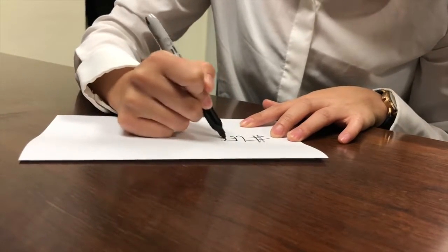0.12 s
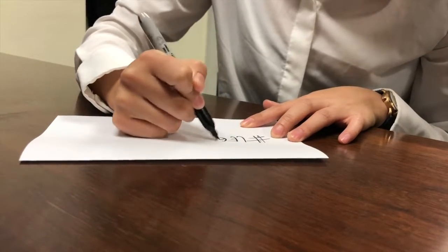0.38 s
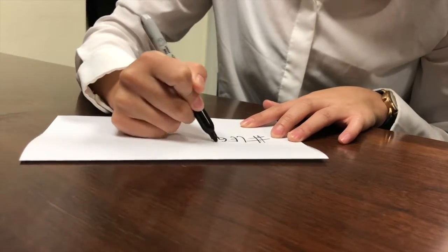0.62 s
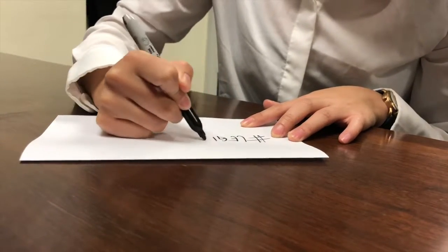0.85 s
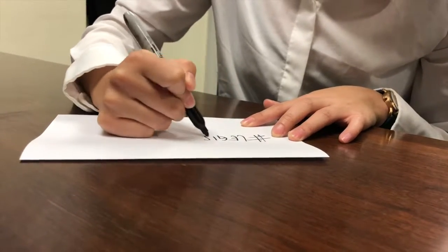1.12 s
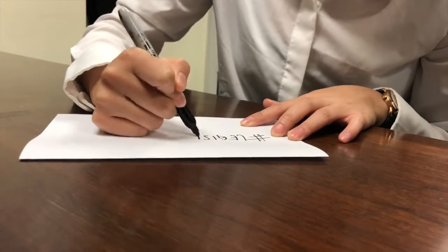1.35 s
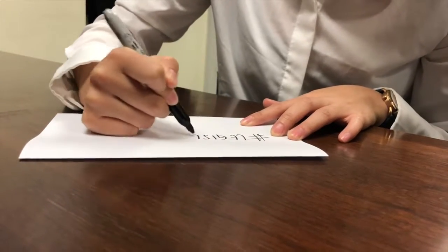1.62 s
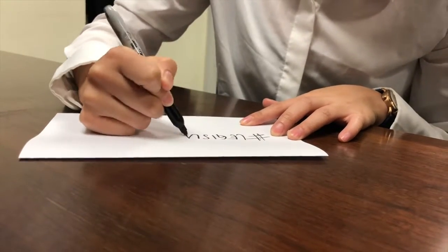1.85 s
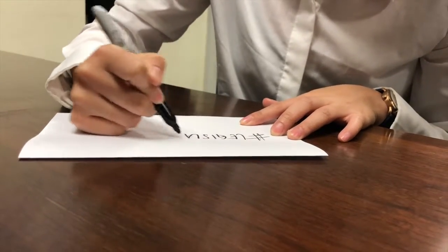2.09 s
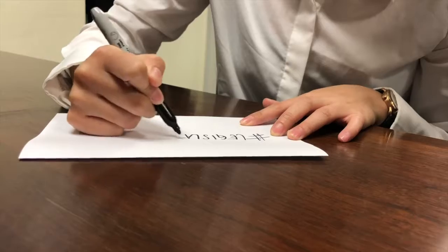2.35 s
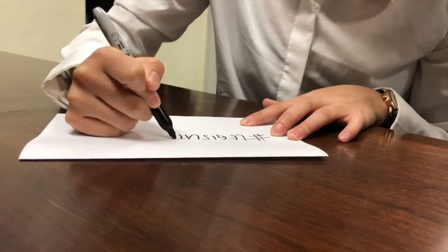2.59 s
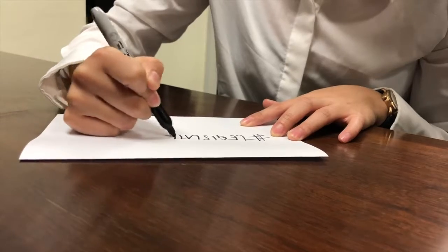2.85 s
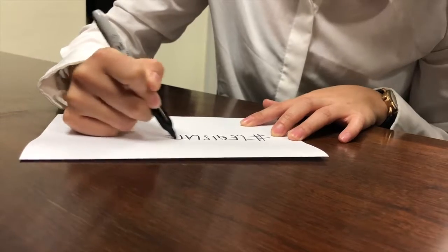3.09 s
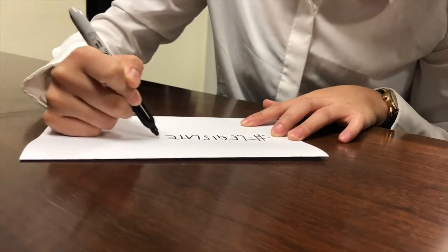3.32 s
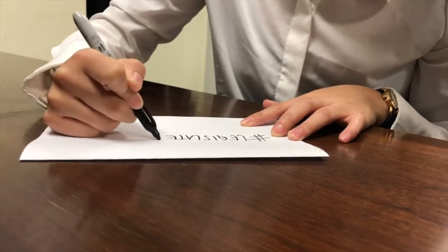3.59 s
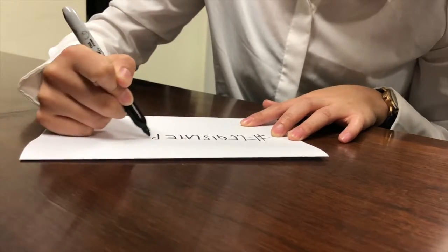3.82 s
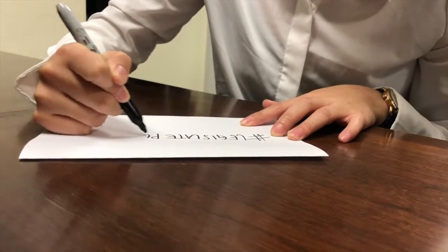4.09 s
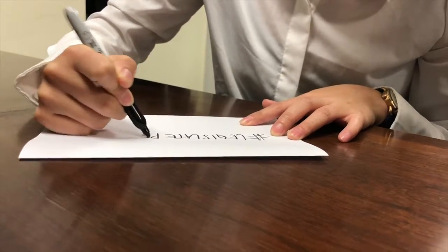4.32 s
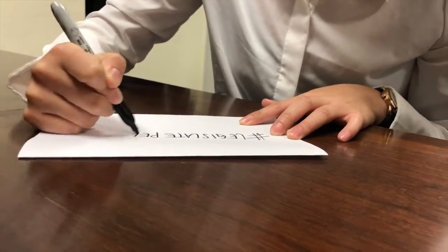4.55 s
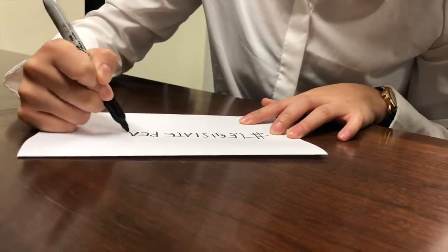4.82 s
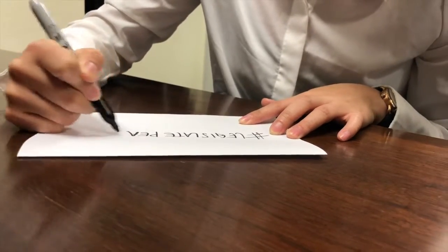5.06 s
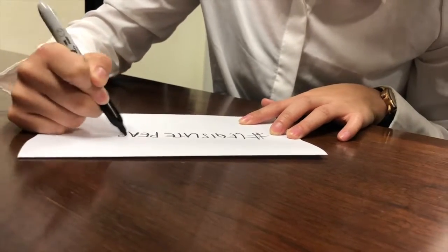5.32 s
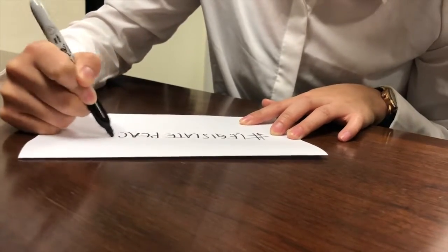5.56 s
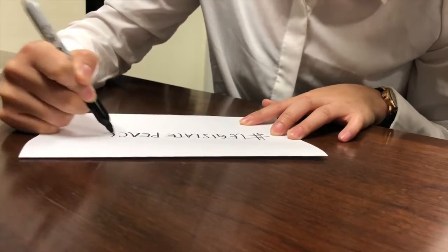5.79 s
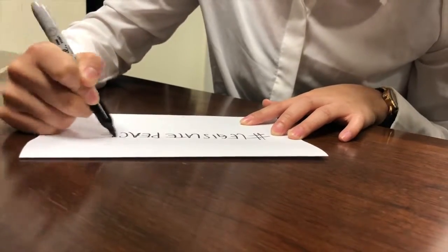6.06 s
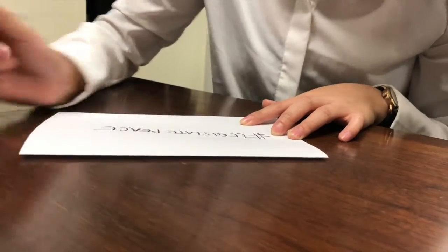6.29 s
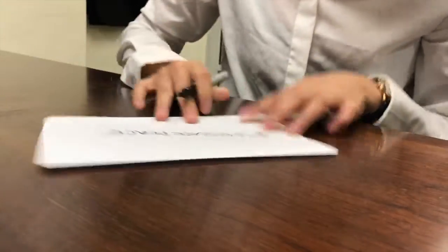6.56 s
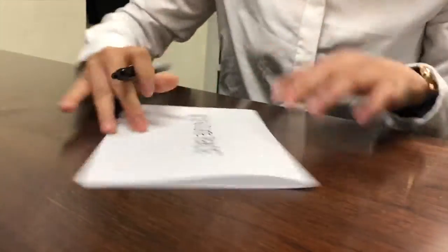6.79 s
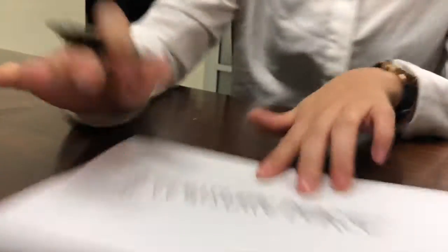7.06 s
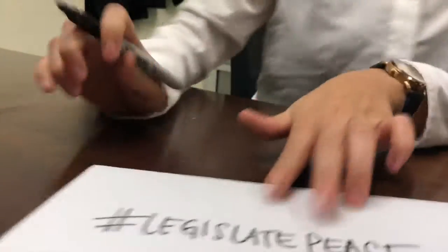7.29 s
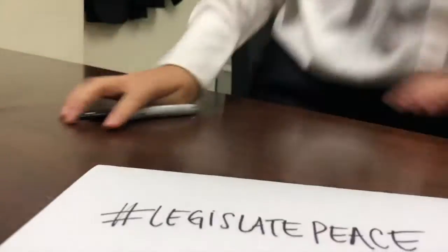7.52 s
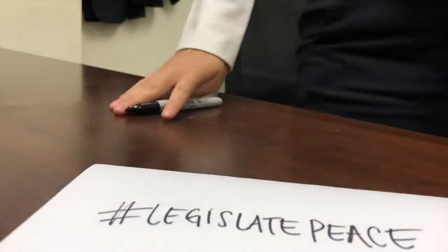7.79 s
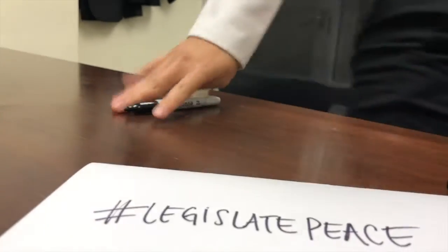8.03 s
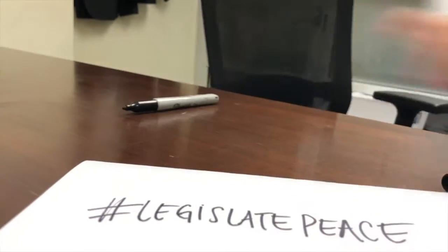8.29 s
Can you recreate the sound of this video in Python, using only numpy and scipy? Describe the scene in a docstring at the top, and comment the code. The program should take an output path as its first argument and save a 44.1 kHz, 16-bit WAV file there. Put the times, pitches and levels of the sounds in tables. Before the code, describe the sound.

A felt-tip marker hisses in quick strokes over paper on a wooden desk, paper slides round, the marker clatters down, a chair creaks.

```python
"""Felt fibres hiss over paper first: a marker writes capitals on a sheet on a wooden desk, most letters opening
with a soft thud. The hiss is stick-slip noise in resonances; the thud is a contact force driving desk modes.
The sheet is then turned round, the marker clatters down (modal rings and a crack) and the writer rises from a
chair (clumped slips in a resonance). Throughout there is faint noise; at the end a wide low rumble swells."""
import sys
import numpy as np
from scipy import signal
from scipy.fft import rfft, irfft
from scipy.io import wavfile
from scipy.ndimage import uniform_filter1d

SR = 44100
rng = np.random.default_rng(int(sys.argv[2]) if len(sys.argv) > 2 else 0)


def how_loud(loudness_db):
    """Turn decibels into a plain amplitude multiplier (0 dB gives 1, 20 dB gives 10)."""
    steps = np.asarray(loudness_db, float) / 20
    return 10 ** steps


def transcribe(signal):
    """Save signal, clipped to [-1, 1], as a 16-bit WAV file at the path in sys.argv[1]."""
    frames = np.atleast_2d(signal).T
    limited = np.clip(frames, -1, 1)
    pcm = np.round(limited * 32767).astype(np.int16)
    wavfile.write(sys.argv[1], SR, pcm)


N = 370426  # samples, 8.4 s


def evened(x):
    """Normalization: scales a signal to unit rms."""
    return x / np.sqrt(np.mean(x ** 2) + 1e-20)


def read(points, hz):
    """Logarithmic frequency axis: interpolates a table of (f/Hz, value) on it."""
    f, value = np.transpose(points)
    return np.interp(np.log(hz + 1), np.log(f + 1), value)


def add(mix, s, sound):
    """Superposition: adds a sound to the mix from s seconds on."""
    part = mix[round(s * SR):][:len(sound)]
    part += sound[:len(part)]


def unroll(rows):
    """Linear interpolation: returns the start time, then every column sample by sample."""
    s, *columns = np.transpose(rows)
    t = np.arange(s[0], s[-1], 1 / SR)
    return s[0], *(np.interp(t, s, c) for c in columns)


def resonate(x, hz, width):
    """Heterodyne resonance: shifts the frequency hz (may vary) to zero, smooths, and shifts back."""
    turn = np.exp(2j * np.pi * np.cumsum(hz * np.ones(len(x))) / SR)
    r = np.exp(-np.pi * width / SR)
    return 2 * (turn * signal.lfilter([1 - r], [1, -r], x / turn)).real


def coloured(x, points):
    """Spectral shaping: weights x by a table of (f/Hz, level/dB), unit rms."""
    weight = how_loud(read(points, np.fft.rfftfreq(len(x), 1 / SR)))
    return evened(irfft(rfft(x) * weight, len(x)))


def band(x, lo_hz, hi_hz):
    """Band limitation: a steep band-pass, unit rms."""
    sos = signal.butter(3, [lo_hz, min(hi_hz, SR / 2.2)], "band", fs=SR, output="sos")
    return evened(signal.sosfilt(sos, x))


def slips(size, spread_db, clump_db):
    """Stick-slip friction: dense tiny slips of uneven size, clumped over a few milliseconds, unit rms."""
    clumps = evened(uniform_filter1d(rng.standard_normal(size), size=130))
    uneven = np.minimum(rng.exponential(1, size), 5)
    return evened(rng.standard_normal(size) * how_loud(spread_db * uneven + clump_db * clumps))


def wander(size):
    """Low-pass random drift: slow chance over some tens of milliseconds."""
    noise = rng.standard_normal(size + 4000)
    return evened(uniform_filter1d(uniform_filter1d(noise, size=1000), size=1000))[2000:-2000]


def ring(modes, tilt_db, scatter):
    """Modal superposition: each blow lands elsewhere and shares its force out anew. tilt_db is per octave."""
    t, out = np.arange(SR // 8) / SR, 0
    for (hz, db, t60), (u, v, w) in zip(modes, rng.standard_normal((len(modes), 3))):
        level = how_loud(db + tilt_db * np.log2(hz / 3000) + scatter * v - 60 * t / t60)
        mode_hz = hz * (1 + 0.0046 * scatter * u)
        out = out + np.sign(w) * level * np.sin(2 * np.pi * mode_hz * t)
    return out / abs(out).max()


def through_plate(x, lag_s, lead_s):
    """Dispersion: bending waves travel as the root of frequency, so the bass arrives last.
    lag_s is the delay at 1 kHz; lead_s advances all below 2 kHz."""
    hz = np.fft.rfftfreq(len(x), 1 / SR)
    cycles = 2 * lag_s * np.sqrt(1000 * hz) - lead_s * np.minimum(hz, 2000)
    return irfft(rfft(x) * np.exp(-2j * np.pi * cycles), len(x))


# spectrum of the steady background noise: (f/Hz, relative level per Hz/dB)
AIR_SPECTRUM = [(15, -51), (25, -19), (70, 6), (200, 5.5), (416, -3.5), (796, -15), (1520, -18),
                (3160, -21.5), (4250, -21.5), (8140, -24), (10700, -25.5), (15800, -31.5), (16400, -79)]


def air():
    """Stationary noise: a random signal with a fixed spectrum, heard in the centre."""
    return how_loud(-69) * coloured(rng.standard_normal(N), AIR_SPECTRUM)


# noise of the rumble: (f/Hz, relative level per Hz/dB)
RUMBLE_SPECTRUM = [(12, -30), (22, 0), (34, 5.5), (50, 3.5), (97, -2), (118, -4), (234, 3), (357, -13.5),
                   (487, -6), (544, -19), (635, -26), (1060, -38), (1840, -55), (3130, -57), (4000, -61),
                   (5200, -96), (8800, -120)]
# fuzzy bands in the rumble: (f/Hz, width/Hz, relative level/dB)
RUMBLE_RESONANCES = [(154, 12, -16), (241, 7.7, -4.5), (480, 25, -16)]
# growth of the rumble: (t/s, level/dB)
RUMBLE_SWELL = [(7.26, -93), (7.35, -80), (7.6, -64.5), (7.8, -61), (8.0, -56), (8.4, -49.5)]
# deep hum in the rumble: (f/Hz, relative level/dB, phase between the ears/rad)
RUMBLE_HUM = (42, 6., 2)


def rumble():
    """Partial interaural coherence: low noise, fuzzy bands and a hum, unlike in the ears, swell to the end."""
    voices = []
    for noise in rng.standard_normal((3, 2 * SR)):
        bands = sum(how_loud(db) * evened(resonate(noise, hz, width)) for hz, width, db in RUMBLE_RESONANCES)
        voices.append(evened(coloured(noise, RUMBLE_SPECTRUM) + bands))
    both, left, right = voices
    t = np.arange(N - 2 * SR, N) / SR
    swell = how_loud(np.interp(t, *np.transpose(RUMBLE_SWELL), left=-200))
    hum_hz, hum_db, ear_phase = RUMBLE_HUM
    hum = how_loud(hum_db) * np.sin(2 * np.pi * hum_hz * t + np.array([[0], [ear_phase]]))
    sound = swell * (1.7 * both + hum + np.array([left, right]))
    return np.pad(sound, ((0, 0), (N - 2 * SR, 0)))


# reverberation time of the room: (f/Hz, t60/s)
ROOM_DECAY = [(200, 0.33), (1000, 0.16), (4000, 0.094), (8000, 0.054), (14000, 0.1)]


def room(x):
    """Reverberation: sparse taps of random sign, each band dying at its own speed."""
    taps = np.zeros(SR // 2)
    at = np.arange(100, SR // 2 - 20, 20)
    taps[at + rng.integers(0, 20, len(at))] = rng.choice([-1., 1.], len(at))
    hz, t, z = signal.stft(taps, SR, nperseg=256)
    decay = how_loud(-60 * t / read(ROOM_DECAY, hz)[:, None])
    tail = signal.istft(z * decay, SR, nperseg=256)[1]
    return signal.fftconvolve(x, tail / np.linalg.norm(tail))[:N]


def chair(s, creak_db, rustle_db, hz):
    """Friction-driven resonance: clumped slips in the chair's resonance, with cloth rustle above."""
    a, b, c = (slips(len(creak_db), spread_db=0.0, clump_db=2.0) for _ in range(3))
    narrow = evened(resonate(resonate(a, hz, 400), hz, 400))
    wide = evened(resonate(b, hz, 1260))
    creak = band(how_loud(-10) * narrow + how_loud(8) * wide, 260, 3100)
    rustle = band(c, 2700, 5900) + how_loud(-7.5) * band(c, 6700, 16000)
    return s, how_loud(creak_db) * (creak + how_loud(rustle_db) * rustle)


# cloth and chair as the writer rises: (t/s, creak level/dB, rustle level re creak/dB, centre of the creak f/Hz)
RISING = [(7.61, -52.5, -16, 990), (7.7, -56.5, -7, 880), (7.78, -58, -12.5, 990), (7.85, -63, -10, 1100),
          (8.0, -61.5, -15, 1560), (8.14, -68.5, -3.5, 1200), (8.27, -77.5, 6, 900), (8.4, -78, -13.5, 950)]


def rise():
    """Sustained friction: level and resonance of chair and cloth glide as the writer rises."""
    return chair(*unroll(RISING))


# short scuffs of the chair: (t/s, length/s, level/dB, rustle level re creak/dB, centre f/Hz)
CHAIR_SCUFFS = [(7.806, 0.03, -53, -11, 1140), (7.899, 0.037, -47.5, -20, 2050),
                (7.942, .07, -56, -17, 1710), (8.044, .04, -60.5, -21.5, 1050),
                (8.172, 0.057, -57, -7.5, 1510), (8.224, .03, -64.5, 3, 1510), (8.34, .03, -66, -4, 1040)]


def scuff(s, length_s, db, rustle_db, hz):
    """Transient friction: a quick catch that fades out."""
    t = np.arange(0, length_s, 1 / SR)
    catch_db = EDGE_DB * np.clip(1 - t / 0.0058, 0, 1)
    fade_db = -11 * (t / length_s) ** 2
    return chair(s, db + catch_db + fade_db, rustle_db, hz)


# brief narrow tones: low bumps in the desk, thin squeaks, creaks of the chair:
# (t/s, length/s, f/Hz, resonance width/Hz, level/dB)
NARROW_TONES = [(3.895, 0.11, 171, 18, -60.5), (6.512, 0.068, 1586, 54, -73), (6.546, 0.036, 217, 40, -62),
                (6.687, 0.062, 3910, 180, -60.5), (6.72, .025, 846, 60, -65),
                (7.108, 0.062, 847, 39, -57.5), (7.138, .05, 151, 60, -50.5), (7.197, 0.05, 125, 50, -44.5),
                (7.255, .04, 120, 42, -53.5), (7.64, 0.17, 768, 66, -55), (7.63, 0.16, 1136, 34, -61),
                (7.9, 0.038, 2120, 180, -57)]


def narrow_tone(s, length_s, hz, width, db):
    """Narrow-band resonance: noise twice through one resonance, swelling and fading."""
    noise = rng.standard_normal(SR // 4)
    tone = evened(resonate(resonate(noise, hz, width), hz, width))[-round(length_s * SR):]
    tone = tone / (0.44 + abs(signal.hilbert(tone)))  # evens out the envelope
    return s, how_loud(db) * evened(tone) * signal.windows.tukey(len(tone), .6)


# the sheet is pushed, turned, slid forward and let go:
# (t/s, hiss level/dB, middle level re hiss/dB, desk bass level re hiss/dB)
SHEET_SLIDE = [(6.3, -91, 14, 20), (6.386, -72, -5.5, -3), (6.57, -73, 7.5, -7), (6.638, -72, 7, -10),
               (6.655, -61, -8, 2.5), (6.73, -52.5, -13, -17), (6.784, -62, -17, -29),
               (6.912, -65, -12, -19), (7.024, -53.5, -14.5, -4.5), (7.084, -57.5, -11, -6),
               (7.196, -48, -14, -6.5), (7.262, -50, -17, -17), (7.33, -67.5, 0, 1), (7.41, -57, -11, -7),
               (7.434, -63, -3, 29), (7.49, -60, -1, 13)]
# hiss of paper on varnish: (f/Hz, relative level per Hz/dB)
SHEET_SPECTRUM = [(1180, -31), (2000, -11), (3090, 2.5), (3490, 3), (3810, 2), (8930, 4), (15700, 0.5),
                  (16400, -21)]


def slide():
    """Broadband friction: smooth wide hiss of paper on varnish; the pressing hand rumbles in the desk."""
    s, hiss_db, middle_db, bass_db = unroll(SHEET_SLIDE)
    a, b, c = (slips(len(hiss_db), spread_db=0.7, clump_db=1.0) for _ in range(3))
    rustle = evened(resonate(b, 5400, 700))
    hiss = coloured(a, SHEET_SPECTRUM) + how_loud(-17) * rustle
    middle = how_loud(middle_db) * band(c, 490, 2330)
    bass = how_loud(bass_db) * band(c, 41, 313)
    return s, how_loud(hiss_db) * (hiss + middle + bass)


# modes of the desk before tilt and scatter: (f/Hz, relative level/dB, t60/s)
DESK_MODES = [(90, -11, .06), (155, -5, .06), (210, -4, .06), (323, -9, .05), (460, -8, .045),
              (555, -7, .045), (665, -6, .04), (785, -1, .04), (830, -2, .05), (940, -8, .06),
              (1090, -12, .06), (1260, -16, .05), (1430, -18, .05), (1840, -20, .04)]


def desk_ring(tilt_db, scatter):
    """Modal response of a plate: the desk's impulse response, tilted by tilt_db per octave."""
    return ring(DESK_MODES, tilt_db, scatter)


# hard plastic and nails on wood: (t/s, level/dB, brightness/dB per octave, desk level re blow/dB)
CLATTER = [(6.652, -41.5, 0, -24), (6.9917, -41.5, 4, -16), (7.022, -40, 8, -19), (7.0301, -29.5, 1, -16),
           (7.038, -33.5, -10, -14.5), (7.11, -38, 6, -7.5), (7.4902, -9, 13, -14), (7.4966, -30, -10, -22),
           (7.5, -4, -1.5, -18), (7.5044, -12.5, 17, -13.5), (7.512, -16.5, -9.5, -28),
           (7.5392, -15, 1.5, -15.5), (7.5596, -13, 4.5, -23), (7.5659, -29.5, 2, -1.5),
           (7.5902, -17, 1, -16.5), (7.5986, -30, -3, -13), (7.805, -41, -6, -15), (7.902, -45, -10, -14),
           (8.189, -44, -5, -7)]
# modes of the barrel before brightness and scatter: (f/Hz, relative level/dB, t60/s)
BARREL_MODES = [(1120, 0, .012), (1500, -2, .01), (1840, 0, .014), (2400, 0, .009), (3150, 1, .008),
                (3900, 0, .007), (4600, -2, .006), (5300, 0, .006), (6500, 0, .006), (8100, -4, .005),
                (9500, -6, .004)]
# noise of the crack before brightness: (f/Hz, relative level per Hz/dB)
CRACK_SPECTRUM = [(300, -35), (1200, 7.5), (3000, 13), (6500, 8), (9000, -7.5), (15000, -16.5)]


def clack(s, db, bright_db, desk_db):
    """Impact excitation: a crack, the barrel's short rings, a duller rattle behind them and the desk."""
    barrel = ring(BARREL_MODES, bright_db, scatter=2.5)
    desk = desk_ring(tilt_db=1.0, scatter=1.5)  # a hard blow favours the upper modes
    t = np.arange(len(desk)) / SR
    tilted = [(hz, level + bright_db * np.log2(hz / 3000)) for hz, level in CRACK_SPECTRUM]
    crack = coloured(rng.standard_normal(len(t)), tilted) * how_loud(-60 * t / 0.0066 - 2.0)
    blow = how_loud(-3) * barrel + crack
    rattle = band(slips(len(t), spread_db=5.0, clump_db=-1.5), 369, 6300) * how_loud(-60 * t / 0.14 - 27)
    return s, how_loud(db) * (blow / abs(blow).max() + rattle + how_loud(desk_db) * desk)


# nib and hand landing on the desk: (t/s, level/dB, contact/ms)
NIB_LANDINGS = [(0.229, -44, 0.96), (0.535, -46.5, 0.79), (0.745, -40, 0.36), (1.388, -47.5, 1),
                (1.78, -49.5, 1), (2.109, -34.5, 0.42), (2.308, -38, 0.21), (2.528, -37, 0.25),
                (2.703, -44.5, 0.84), (2.967, -40, 0.49), (3.183, -39, 0.29), (3.493, -41.5, 0.58),
                (3.708, -43, 0.5), (3.994, -43, 0.68), (4.256, -41.5, 0.36), (4.452, -40, 0.74),
                (4.617, -47.5, 1), (5.052, -35.5, 0.46), (5.624, -46, 1), (5.935, -39, 0.69),
                (6.169, -33.5, 0.28), (6.651, -52, .62), (7.198, -55, 0.88), (7.429, -34.5, .7),
                (7.438, -33, 1), (7.449, -37.5, .8), (7.463, -37, .8)]
# first bending wave: (f/Hz, relative level/dB)
FRONT_SPECTRUM = [(60, -11.5), (200, -2.5), (500, 3), (850, 2.5), (1150, -11), (1450, -32), (2500, -42.5),
                  (4000, -63)]


def landing(s, db, contact_ms):
    """Contact force and dispersion: a half-sine push sends a bending wave through the ringing desk, with a tick."""
    push = np.sin(np.pi * np.linspace(0, 1, max(round(contact_ms * SR / 1000), 3)))
    tilt_db = np.clip(0.4 * (db + 34.5), -5, 5)  # softer landings reach the upper modes less
    modes = desk_ring(tilt_db, scatter=1.5)
    front = irfft(how_loud(read(FRONT_SPECTRUM, np.fft.rfftfreq(len(modes), 1 / SR))), len(modes))
    wave = front / front.max() + how_loud(-6.5) * modes
    thud = np.convolve(through_plate(wave, lag_s=0.003915, lead_s=0.0011), push)
    thud /= abs(thud).max()
    tick = rng.standard_normal(90) * how_loud(-60 * np.arange(90) / SR / 0.014)
    add(thud, .0012, how_loud(-18.5) * tick)
    return s, how_loud(db) * thud


# top rings of the felt: (f/Hz, width/Hz, relative level/dB)
TOP_RINGS = [(9900, 2230, 0.5), (14000, 3100, -7.5)]


def felt(rub_db, hz, second_db, top_db, desk_db):
    """Friction-excited resonance: felt fibres slip over paper and excite the nib's rings and the desk."""
    size = len(rub_db)
    second_hz = 6980 - 2 * max(hz - 4600, 0)  # sinks as the first ring climbs above 4600 Hz
    # the rings wander in pitch (share) and strength (dB) as the nib turns
    pitch_wander, level_wander_db = 0.051, 1.5
    hz = hz * (1 + pitch_wander * wander(size))
    second_hz = second_hz * (1 + pitch_wander * wander(size))
    second_db = second_db + level_wander_db * wander(size)
    top_db = top_db + level_wander_db * wander(size)
    # the grip of the felt flutters
    grip = how_loud(1.05 * evened(uniform_filter1d(rng.standard_normal(size), size=200)))
    a, b, c, d, e, f = (grip * slips(size, spread_db=1.8, clump_db=-1.34) for _ in range(6))
    first = how_loud(-3) * evened(resonate(a, hz, 450)) + how_loud(-3) * band(b, 2200, 5800)
    second = how_loud(-3) * evened(resonate(c, second_hz, 740)) + how_loud(-17.0) * band(d, 6500, 6900)
    top = 0
    for x, (centre, width, db) in zip((e, f), TOP_RINGS):
        peak = signal.iirpeak(centre, centre / width, SR)
        top = top + how_loud(db) * evened(signal.lfilter(*peak, x))
    desk = signal.oaconvolve(a, desk_ring(tilt_db=5., scatter=1.2))[:size]
    desk = band(how_loud(-0.5) * evened(desk) + band(d, 715, 2160), 385, 2370)
    sound = first + how_loud(second_db) * second + how_loud(top_db) * top + how_loud(desk_db) * desk
    # the sheet's dense short rings streak the hiss
    sheet = rng.standard_normal(600) * how_loud(-60 * np.arange(600) / SR / .01 - 25)
    sheet[0] = 1
    sound = signal.oaconvolve(sound, sheet / np.linalg.norm(sheet))[:size]
    return how_loud(rub_db) * sound * signal.windows.tukey(size, 90 / size)


# the nib brushes the sheet lightly on its way to the next letter:
# (t/s, length/s, rub level/dB, second ring level re first/dB)
NIB_BRUSHES = [(0.444, 0.016, -76.5, 13.5), (0.483, 0.058, -80, 1), (0.907, 0.055, -77.5, -3),
               (1.301, .055, -74.5, -1), (1.576, 0.095, -69, 0), (1.701, 0.048, -76, -3),
               (2.03, 0.054, -86, 0), (2.264, 0.046, -77.5, 0), (2.465, 0.029, -80, -3),
               (2.671, 0.046, -75.5, 2), (2.894, 0.058, -79, -2.5), (3.117, .042, -79.5, -5),
               (3.387, 0.048, -75.5, -2), (3.885, 0.082, -70, -3), (4.185, .06, -80.5, -5),
               (4.388, 0.056, -78, -4), (4.606, 0.0384, -72, -2), (4.959, 0.091, -77.5, -1),
               (5.234, 0.042, -85, -2), (5.541, 0.079, -76, 2), (5.849, 0.056, -81, 4),
               (6.057, 0.11, -75, 3)]


def brush(s, length_s, db, second_db):
    """Light-contact friction: a touch that swells and fades and drives the desk only weakly."""
    u = np.arange(0, length_s, 1 / SR) / length_s
    touch_share, leave_share = 0.27, 0.26
    edges = np.clip(1 - u / touch_share, 0, 1) + np.clip(1 - (1 - u) / leave_share, 0, 1)
    return s, felt(db - 12 * edges, hz=4450, second_db=second_db, top_db=1.5, desk_db=-9)


# strokes of the nib, pressed down: (t/s, length/s, rub level at the start, in the middle, at the end/dB,
# first ring f/Hz, second ring level/dB, top rings level/dB)
NIB_STROKES = [ (0.0, .17, -69, -58.5, -74, 3480, 6.5, -2.5), (.228, .034, -60, -67.5, -67, 3660, 2, -2),
               (0.278, 0.073, -59, -65.5, -74, 3440, 6.5, -2.5),
               (0.342, 0.098, -65, -65.5, -79, 4420, 11.5, 3.5),
               (0.565, 0.088, -64.5, -67.5, -75, 4600, 12.5, 3.5), (0.796, .11, -67, -65, -71, 4450, -1, 0),
               (1.042, 0.17, -62.5, -62, -68.5, 3800, -1, -3.5),
               (1.189, 0.098, -66.5, -65, -63, 4000, 3, -2), (1.427, 0.1, -61, -61, -74, 4240, 5.5, -1.5),
               (1.505, 0.069, -67, -62.5, -60, 4120, -5, -6.5),
               (1.83, 0.089, -55.5, -61, -72, 4600, 5, 2.5), (1.937, 0.099, -61.5, -63.5, -78, 5040, 4, -1),
               (2.134, 0.11, -62.5, -70, -70, 4230, 1.5, 3), (2.306, 0.023, -65, -67, -68, 4330, -8, -4),
               (2.348, 0.086, -64, -61, -75, 3750, -2, -2.5), (2.549, 0.088, -58, -67.5, -74, 5300, 6.5, 4),
               (2.739, 0.14, -56, -62.5, -66.5, 5150, -6, 0.5),
               (2.971, 0.018, -65, -63.5, -66, 4000, -10, -9), (3.01, .08, -65, -63.5, -71, 3900, -10, -6),
               (3.214, .155, -65.5, -66, -71, 4700, -1, 1),
               (3.539, 0.086, -56.5, -59.5, -64, 4760, -7, 2.5),
               (3.623, 0.022, -68, -63.5, -68, 4220, -8, -5),
               (3.702, 0.015, -56.5, -58.5, -76, 4160, -12, -8),
               (3.718, 0.068, -62, -65.5, -56, 4650, -13, -1.5), (3.771, .11, -65, -56, -81, 4620, -13, -3),
               (4.026, 0.15, -55, -63, -68.5, 4600, -9, -2), (4.286, 0.087, -67, -65, -72, 4400, -13, -4),
               (4.479, 0.12, -64.5, -68.5, -84, 4440, -2, 1),
               (4.636, 0.094, -61.5, -57, -60, 4400, -7, 0.5),
               (4.735, .088, -56.5, -61, -64, 4100, -15, 0.5),
               (4.846, 0.095, -56, -57.5, -69, 4350, -6, -2), (4.937, .022, -63, -65.5, -66, 4120, -12, -3),
               (5.082, .14, -66, -69, -73.5, 4540, -2, 2), (5.349, 0.084, -56, -60.5, -63, 4300, -7, -1.5),
               (5.416, 0.13, -55, -60, -69, 4200, -8, 2), (5.671, 0.089, -56, -56.5, -61, 4150, -19, 3),
               (5.742, 0.095, -62, -63.5, -69, 3620, -16, -4),
               (5.961, 0.1, -64.5, -60.5, -74, 3670, -10, -5.5),
               (6.188, 0.08, -61.5, -58, -67.5, 4210, -8, 2.5)]
# share of the desk along the line: (t/s, level/dB)
DESK_ALONG_LINE = [(0.0, 7), (.1, -3), (.3, -1), (.6, 1), (.85, -15), (1.05, 6), (1.15, -2.5), (1.23, 5),
                   (1.5, -2.5), (2.2, -4.5), (3.0, -5), (3.8, -5.5), (4.7, -7.5), (5.4, -4.5), (6.2, -8)]
EDGE_DB = -17.5  # dip at the very edge of a stroke, and at the start of a scuff


def stroke(s, length_s, start_db, middle_db, end_db, hz, second_db, top_db):
    """Speed-dependent friction: a quick grab, a level that follows the hand's speed, then a slower lift."""
    t = np.arange(0, length_s, 1 / SR)
    usual_db = -63.5
    lift_s = min(.02, length_s / 2)
    grab_s = 0.0076 / how_loud(0.7 * (start_db - usual_db))  # a faster start grabs sooner
    edges = np.clip(1 - t / grab_s, 0, 1) + np.clip(1 - (length_s - t) / lift_s, 0, 1)
    swell_db = (middle_db - (start_db + end_db) / 2) * np.sin(np.pi * t / length_s) ** 2
    speed_db = start_db + (end_db - start_db) * t / length_s + swell_db
    drift_db = speed_db - middle_db
    # the desk follows the rub only in part
    desk_db = np.interp(s + t, *np.transpose(DESK_ALONG_LINE)) - 0.34 * (speed_db - usual_db)
    # the higher rings change less than the first; the top gains most where the nib runs fastest
    second_db = second_db - 0.17 * drift_db
    top_db = top_db - 0.081 * drift_db + 0.35 * swell_db
    return s, felt(speed_db + EDGE_DB * edges, hz, second_db, top_db, desk_db)


def scene():
    """Superposition of sources: the desk is central, through a microphone deaf to deep bass; the rumble is wide."""
    rubs, blows = np.zeros((2, N))
    for mix, play, table in ((rubs, scuff, CHAIR_SCUFFS), (rubs, narrow_tone, NARROW_TONES),
                             (blows, clack, CLATTER), (blows, landing, NIB_LANDINGS),
                             (rubs, brush, NIB_BRUSHES), (rubs, stroke, NIB_STROKES)):
        for row in table:
            add(mix, *play(*row))
    add(rubs, *rise())
    add(rubs, *slide())
    near = rubs + blows + room(how_loud(-18) * rubs + how_loud(-11.0) * blows)
    near = signal.sosfilt(signal.butter(2, 80, "high", fs=SR, output="sos"), near)
    return near + air() + rumble()


def low_pass(x):
    """Removes everything above the highest recorded frequency."""
    return signal.sosfilt(signal.butter(12, 17080, fs=SR, output="sos"), x)


def record(dry):
    """Band limitation: the recorder's linear-phase low-pass at 16250 Hz."""
    edge = signal.firwin(201, 16250, window=("kaiser", 5), fs=SR)
    mix = signal.oaconvolve(dry, edge[None], "same")
    return low_pass(mix)


dry = scene()
out = record(dry)
transcribe(out)
```